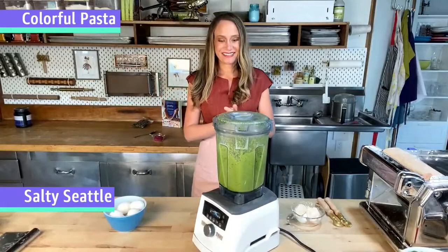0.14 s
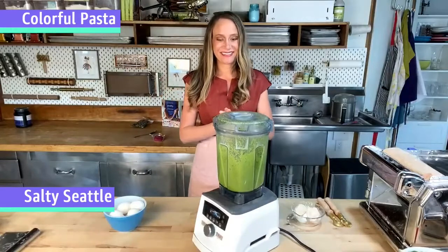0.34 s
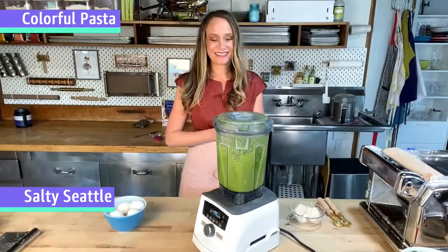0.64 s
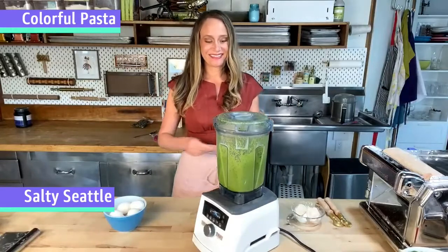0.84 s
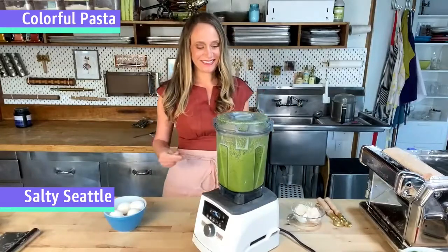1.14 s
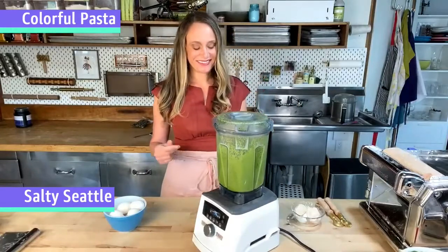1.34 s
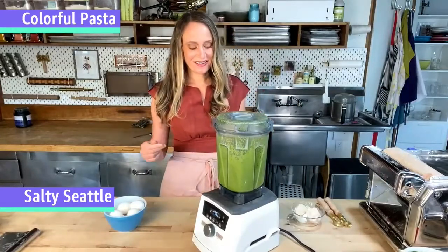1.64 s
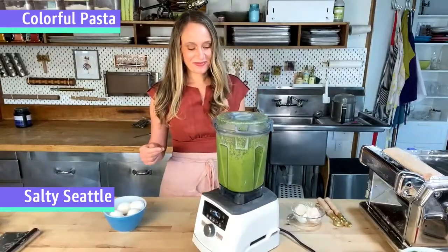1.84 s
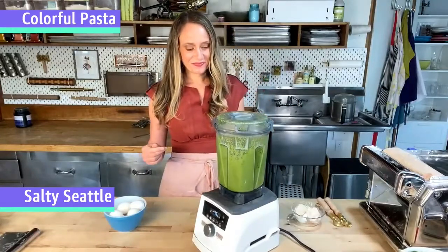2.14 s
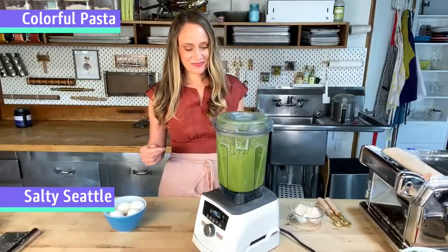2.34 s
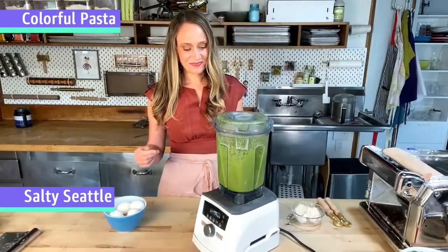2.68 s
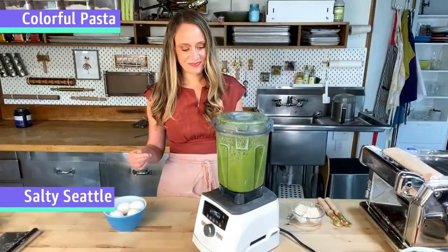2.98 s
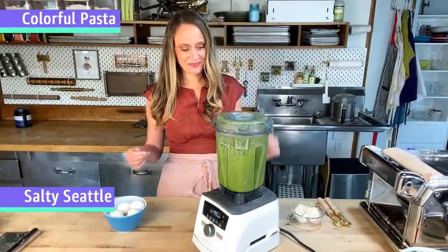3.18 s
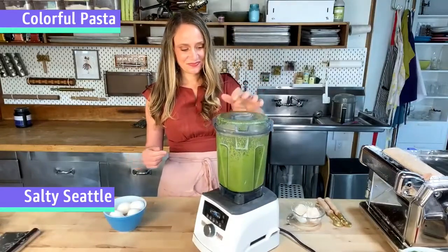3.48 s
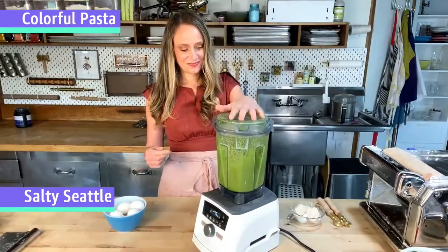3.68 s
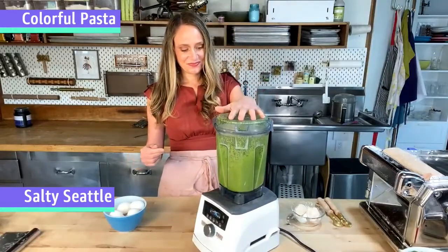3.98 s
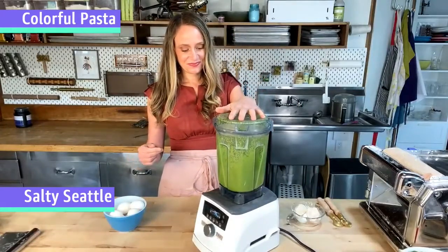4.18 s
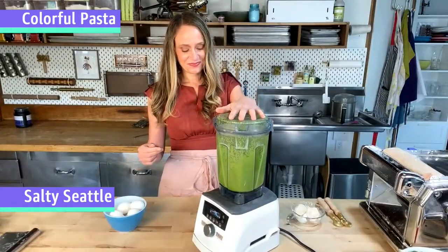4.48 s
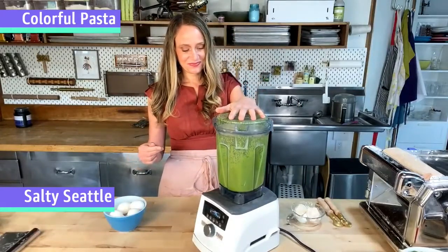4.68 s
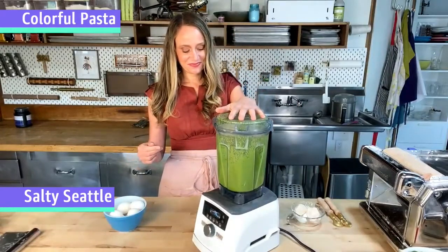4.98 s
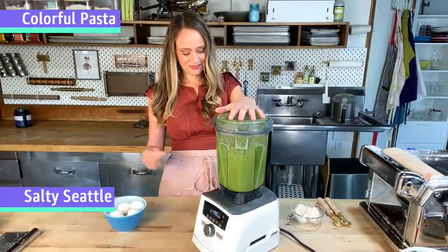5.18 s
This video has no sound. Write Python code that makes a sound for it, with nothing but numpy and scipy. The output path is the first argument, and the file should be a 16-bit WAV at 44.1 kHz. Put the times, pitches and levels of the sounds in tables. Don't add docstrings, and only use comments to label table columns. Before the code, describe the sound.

Faint, even, fluttering hiss from a blender heard through a call link, with small tonal ticks and chirps clustering around the middle.

```python
import sys
import numpy as np
from scipy import signal
from scipy.fft import rfft, irfft
from scipy.io import wavfile
from scipy.ndimage import uniform_filter1d

SR = 44100
rng = np.random.default_rng(int(sys.argv[2]) if len(sys.argv) > 2 else 0)


def volts_from_db(level):
    exponent = np.asarray(level, float) / 20
    return 10 ** exponent


def transcribe(signal):
    frames = np.atleast_2d(signal).T
    limited = np.clip(frames, -1, 1)
    pcm = np.round(limited * 32767).astype(np.int16)
    wavfile.write(sys.argv[1], SR, pcm)


N = 234700

# f/Hz, level/dB per Hz
TOP_COLOUR = [(6000, -11), (6900, 1.5), (7330, -3.5), (7700, -8), (7950, -18.5), (8300, -16.5),
              (8900, -26.5), (9500, -37.5), (9750, -70)]
# centre t/s, depth/dB, length/ms
TOP_DIPS = [(.21, 15, 20), (.385, 7, 13), (.66, 26, 30), (.8, 4, 15), (.975, 21, 24), (1.19, 15, 10),
            (1.3, 17, 14), (1.345, 18, 18), (1.45, 14, 19), (1.612, 20, 26), (1.93, 12, 11), (2.14, 22, 50),
            (2.25, 17, 30), (2.345, 0, 8.5), (2.41, 17, 17), (3.09, 23, 18), (3.86, 22, 13),
            (4.245, 10, 23), (4.52, 18, 28), (5.03, 10, 10), (5.12, 21, 14), (5.2, 6.5, 40), (5.27, 5, 17)]
# centre t/s, depth/dB, length/ms
DROPOUTS = [
    (.9535, 22, 19),
    (2.5445, 14, 19),
]
# t/s, level/dB
GRIP = [(0.0, -51), (0.77, -49.5), (1.08, -48), (1.41, -49), (1.7, -49), (1.88, -46), (2.06, -49),
        (2.16, -45.5), (2.24, -47.5), (2.59, -49), (2.68, -46.5), (2.85, -50.5), (2.98, -45.5),
        (3.13, -48.5), (3.48, -50), (4.06, -49), (4.42, -50), (5.32, -49.5)]
# t/s, level change/dB
LEARNING = [
    (.8, 2.5),
    (1.0, -0.5),
    (2.05, 1),
    (3.2, -9),
    (4.4, -5),
    (4.75, -10),
]
# f/Hz, level/dB per Hz
RUMBLE_COLOUR = [(12, -43.5), (20, -9), (280, -8), (316, -3), (403, -6), (443, 1), (500, 1.5), (650, -31),
                 (1100, -120)]
# f/Hz, level/dB per Hz
JAR_COLOUR = [(290, -65), (500, -24.5), (590, -23), (624, -13), (888, -9.5), (938, -6.5), (1080, -3.5),
              (1240, -8), (1350, -1), (1610, -0.5), (2930, -10), (3610, -5.5), (4210, -14.5), (6130, -9),
              (7000, -17.5), (9100, -49), (15400, -120)]
# f/Hz, width/Hz, level/dB rms
RINGS = [(701, 87, -73), (756, 27, -77.5), (835, 29, -68), (955.3, 59, -62), (1250, 52, -61.5),
         (1420, 21, -63), (1632, 13, -61.5), (1574, 140, -69), (1890, 21, -68), (2324, 130, -61),
         (3616, 15, -67.5), (3588, 150, -68), (3830, 240, -66), (5956, 290, -68)]
# centre t/s, peak level/dB, length/ms
THIRD_OPENINGS = [
    (.869, -46, 35),
    (1.25, -46, 19),
    (1.451, -40, 6.1),
    (1.981, -44, 46),
    (2.156, -36, 17.5),
    (2.652, -43.5, 6.4),
    (2.93, -46, 9),
    (2.996, -41, 33),
    (4.899, -51.5, 53),
]
# centre t/s, peak level/dB, length/ms
FOURTH_OPENINGS = [(.261, -34.5, 5.8), (.923, -40.5, 7.1), (1.197, -42.5, 11), (1.213, -42, 8),
                   (1.256, -32.5, 9.6), (1.46, -40.5, 21), (1.52, -35, 8.7), (1.614, -31, 8),
                   (1.778, -33, 12), (1.794, -36.5, 14), (1.818, -30, 10.7), (1.866, -34, 18),
                   (1.894, -33.5, 13.6), (2.029, -39.5, 11), (2.127, -32.5, 10.5), (2.34, -30.5, 9.6),
                   (2.508, -35.5, 12.5), (2.642, -33, 9.5), (2.721, -36.5, 9.7), (2.987, -29, 11.7),
                   (3.013, -37, 15), (3.068, -39, 9.1), (3.101, -32.5, 9.3), (3.783, -47, 31),
                   (3.89, -40.5, 34), (3.974, -48, 31), (4.1, -42.5, 21), (4.231, -48, 30),
                   (4.334, -40.5, 30), (4.532, -42, 8.2)]
# centre t/s, peak level/dB, length/ms
FIFTH_OPENINGS = [(.872, -41, 5.9), (1.815, -34, 4.6), (1.873, -36, 8.2), (1.887, -35, 7.3),
                  (1.943, -34.5, 5.2), (2.085, -39, 9.5), (2.113, -37.5, 17), (2.139, -32.5, 22),
                  (2.148, -29, 9.8), (2.263, -43, 10), (2.421, -43.5, 10), (2.446, -41, 12),
                  (2.782, -40, 5.2), (2.807, -41, 8.4), (3.021, -34, 5.9), (3.11, -39, 5), (4.001, -47, 10),
                  (4.464, -43, 9.2)]
# centre t/s, peak level/dB, f/Hz, length/ms
STRAY_OPENINGS = [(.23, -40, 1360, 6.5), (.583, -46, 2030, 16), (0.677, -42, 1516, 20),
                  (0.702, -34.5, 1510, 9), (.805, -37.5, 2010, 5.9), (1.197, -40.5, 1520, 5.2),
                  (1.482, -39.5, 1325, 14), (1.492, -32, 1320, 3.5), (1.605, -41, 2330, 5.2),
                  (1.724, -37, 1420, 11), (1.862, -38, 1480, 4), (1.893, -44, 2300, 13),
                  (1.905, -41, 1970, 7.1), (1.999, -36.5, 1040, 4.9), (2.141, -27.5, 1326, 5.9),
                  (2.153, -37.5, 1520, 33), (2.153, -39, 1800, 18), (2.153, -40, 2334, 23),
                  (2.154, -42, 3660, 13), (2.247, -44.5, 2310, 9), (2.286, -34.5, 1470, 6),
                  (2.395, -36.5, 1870, 4.1), (2.499, -26.5, 1460, 3.3), (2.502, -39.5, 1710, 14),
                  (2.525, -39, 1480, 7.4), (2.686, -40, 2386, 8.3), (2.865, -42, 2365, 9.1),
                  (2.942, -43, 2420, 14), (4.291, -46, 1420, 16)]
# centre t/s, peak level/dB, f/Hz, length/ms
MORE_OPENINGS = [
    (2.902, -60, 6220, 41),
    (4.33, -58.5, 3616, 200),
    (4.5, -53.5, 1637, 280),
    (1.264, -46, 1250, 34),
    (4.781, -52, 1255, 130),
    (5.0, -54.5, 1264, 130),
    (5.26, -57, 953, 35),
]
# t/s, f/Hz
SPEED = [(0, 635), (1.05, 643), (1.3, 629), (1.9, 631), (2.05, 644), (2.2, 626), (2.32, 642), (2.6, 631),
         (3.0, 629), (3.4, 638), (5.3, 634)]
# multiple of shaft rate, level/dB rms
ORDERS = [(1, -96.5), (3, -66), (4, -62), (5, -64), (6, -67), (8, -67.5), (10, -70), (14, -71.5), (20, -72)]
# centre t/s, peak level/dB rms, length/ms
SECOND_OPENINGS = [(.45, -61, 450), (.79, -58, 130), (.89, -56.5, 220), (1.09, -54, 170),
                   (1.27, -54.5, 310), (1.44, -52.5, 57), (1.61, -54.5, 130), (1.74, -60, 270),
                   (1.87, -51.5, 100), (2.14, -51.5, 230), (2.42, -57.5, 390), (2.65, -58, 70),
                   (2.801, -59.5, 250), (3.15, -63.5, 1000), (3.57, -63.5, 150), (3.8, -65.5, 300),
                   (3.94, -69, 100), (4.34, -69.5, 64), (4.52, -63.5, 270), (4.82, -66.5, 570)]


def coloured(points):
    hz, db = np.transpose(points)
    bins = np.fft.rfftfreq(N, 1 / SR) + 1
    shape = volts_from_db(np.interp(np.log(bins), np.log(hz), db, left=-200, right=-200))
    x = irfft(rfft(rng.standard_normal(N)) * shape, N)
    return x / x.std()


def in_time(rows):
    s, *columns = np.transpose(rows)
    return [np.interp(np.arange(N) / SR, s, c) for c in columns]


def drift(rate_hz):
    r = np.exp(-80 * np.pi * rate_hz / SR)
    coarse = rng.standard_normal(N // 40 + 2002)
    slow = signal.lfilter([1], [1, -2 * r, r * r], coarse)[2000:]
    return np.interp(np.arange(N) / 40, np.arange(len(slow)), slow / slow.std())


def whistle(hz, width_hz):
    r, w = np.exp(-np.pi * width_hz / SR), 2 * np.pi * hz / SR
    poles = [1, -2 * r * np.cos(w), r * r]
    once = signal.lfilter([1, 0, -1], poles, rng.standard_normal(N))
    twice = signal.lfilter([1], poles, once)
    return twice / twice.std()


def dips(rows):
    t, loss_db = np.arange(N) / SR, np.zeros(N)
    for s, depth_db, ms in rows:
        near = slice(int((s - .1) * SR), int((s + .1) * SR))
        loss_db[near] += depth_db * np.exp(-((t[near] - s) * 3000 / ms) ** 2)
    return volts_from_db(-loss_db)


def swing_db():
    grip_db = in_time(GRIP)[0]
    return grip_db - np.median(grip_db)


def learnt_db():
    return in_time(LEARNING)[0]


def top_band():
    frame = SR // 200
    steps_db = np.repeat(3.0 * rng.standard_normal(N // frame + 1), frame)[:N]
    flutter_db = uniform_filter1d(steps_db, size=60) + 0.34 * drift(25) + 0.54 * drift(8.9)
    return volts_from_db(-69 + flutter_db) * dips(TOP_DIPS) * coloured(TOP_COLOUR)


def rumble(opening):
    level_db = -81 + 0.62 * swing_db() + drift(24)
    return volts_from_db(level_db) * (1 + 60 * opening) * coloured(RUMBLE_COLOUR)


def churn():
    body_db = in_time(GRIP)[0] + 0.13
    hiss_db = -49 + 0.41 * swing_db()
    low_db = -46 + learnt_db()
    together_db = .6 * drift(9)
    spectrum, bins = rfft(coloured(JAR_COLOUR)), np.fft.rfftfreq(N, 1 / SR)
    edges = np.geomspace(480, 7000, 11)
    out = np.zeros(N)
    for low, high in zip(edges, edges[1:]):
        if high < 900:
            level_db = low_db
        elif low < 2400:
            level_db = body_db
        else:
            level_db = hiss_db
        patch_db = together_db + (1.8 if low < 2400 else .9) * drift(48)
        band = irfft(spectrum * (bins >= low) * (bins < high), N)
        out += volts_from_db(level_db + patch_db) * band
    swell_db = swing_db()
    for hz, width_hz, db in RINGS:
        out += volts_from_db(db + swell_db + 2.1 * drift(20)) * whistle(hz, width_hz)
    return out


def faint_openings(order_bands_hz):
    when, size, length, pick, place = rng.random((70, 5)).T
    share = np.cumsum(volts_from_db(2.5 * swing_db()))
    s = np.interp(when, share / share[-1], np.linspace(.1, N / SR - .1, N))
    third, fourth, fifth = order_bands_hz
    bands_hz = np.array([third, fourth, fourth, fifth, fifth])
    on_order = bands_hz[(place * 5).astype(int)]
    between = 1330 * 1.45 ** place
    hz = np.where(pick < .6, on_order, between)
    peak_db = -50 + 3 * (2 * size - 1)
    ms = 10.5 * 2 ** (2 * length - 1)
    return list(zip(s, peak_db, hz, ms))


def openings():
    order_bands_hz = 958, 1257.4, 1620
    rows = []
    for hz, table in zip(order_bands_hz, [THIRD_OPENINGS, FOURTH_OPENINGS, FIFTH_OPENINGS]):
        rows += [(s, db, hz, ms) for s, db, ms in table]
    return rows + list(STRAY_OPENINGS) + list(MORE_OPENINGS) + faint_openings(order_bands_hz)


def chirps():
    out, rows = np.zeros(N), openings()
    chances = rng.uniform(-0.92, 1, (len(rows), 3))
    for (s, peak_db, hz, ms), (phase, other, apart) in zip(rows, chances):
        half = int(ms * SR / 1000 * 1.093)
        t = np.arange(-half, half) / SR
        tone = np.sin(2 * np.pi * hz * t + np.pi * phase)
        neighbour = np.sin(2 * np.pi * (hz + 160 * apart) * t + np.pi * other)
        envelope = np.hanning(2 * half) * np.exp(-.35 * t * SR / half)
        at = int(s * SR) - half
        out[at:at + 2 * half] += volts_from_db(peak_db - 0.4) * envelope * (tone + 0.3 * neighbour)
    return out


def second_order_db():
    t, level_db = np.arange(N) / SR, -70.5 + learnt_db()
    for s, peak_db, ms in SECOND_OPENINGS:
        flank_db = 14 * ((t - s) * 2000 / ms) ** 2
        level_db = np.maximum(level_db, peak_db - flank_db)
    return level_db


def motor():
    shaft_hz = in_time(SPEED)[0] / 2 * (1 + .001 * drift(1.5) + .004 * drift(20))
    angle = 2 * np.pi * np.cumsum(shaft_hz) / SR
    second_db = second_order_db()
    out = np.zeros(N)
    for order, db in [(2, second_db - 2.5)] + list(ORDERS):
        wander = .75 * drift(10)
        flicker_db = 2.2 * drift(10)
        out += np.sqrt(2) * volts_from_db(db + flicker_db) * np.sin(order * angle + wander)
    ring_db = uniform_filter1d(second_db, size=6000) - 11
    return out + volts_from_db(ring_db) * whistle(565.8, 31)


def scene():
    bursts = chirps()
    opening = np.sqrt(abs(uniform_filter1d(bursts ** 2, size=900)))
    source = top_band() + rumble(opening) + churn() * (1 + 17 * opening) + bursts + motor()
    return (source * dips(DROPOUTS))[None]


def low_pass(x):
    return signal.sosfilt(signal.butter(12, 15400, fs=SR, output="sos"), x)


def record(dry):
    mix = dry + volts_from_db(-97.5) * rng.standard_normal(dry.shape)
    return low_pass(mix)


dry = scene()
out = record(dry)
transcribe(out)
```